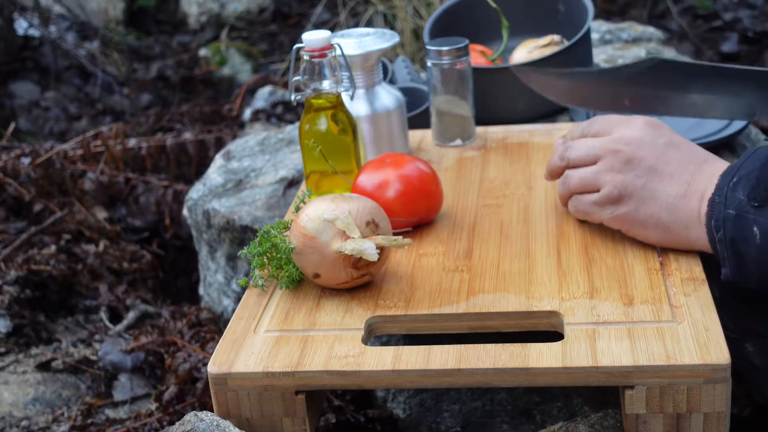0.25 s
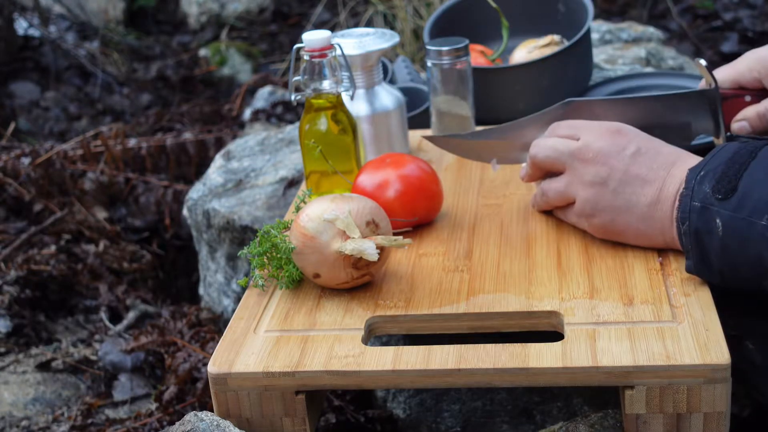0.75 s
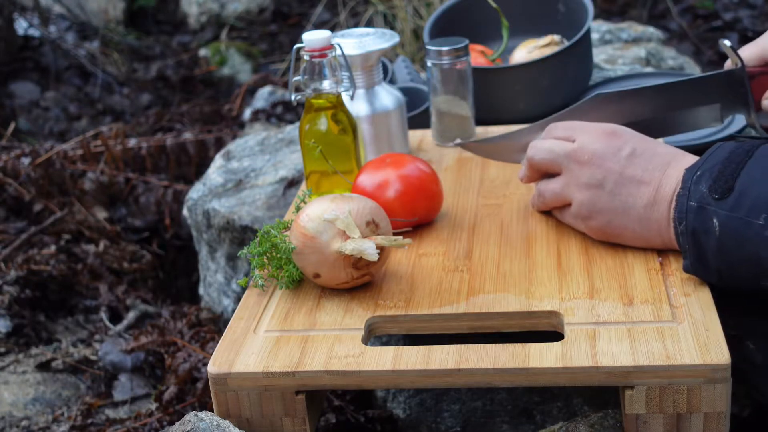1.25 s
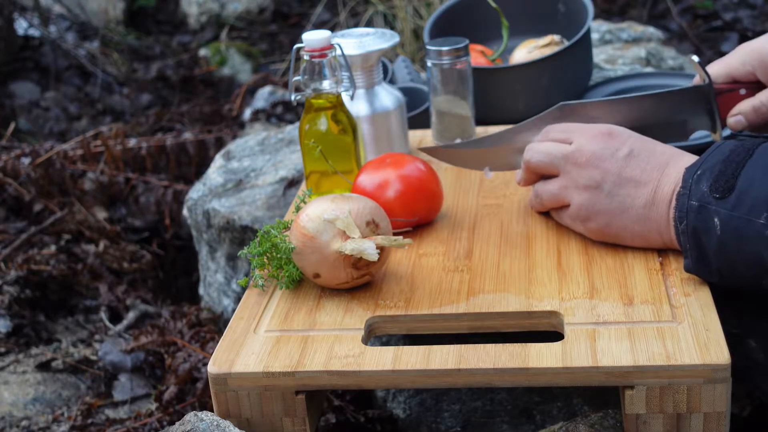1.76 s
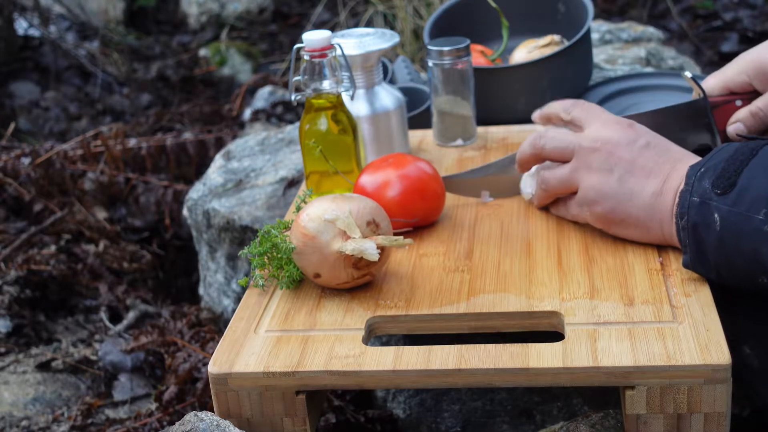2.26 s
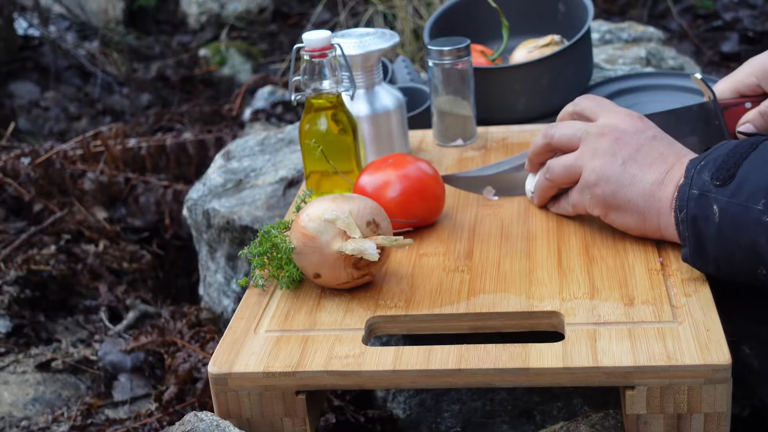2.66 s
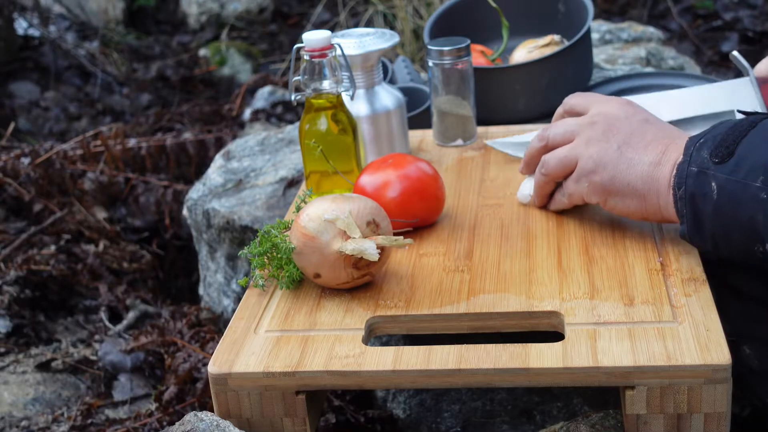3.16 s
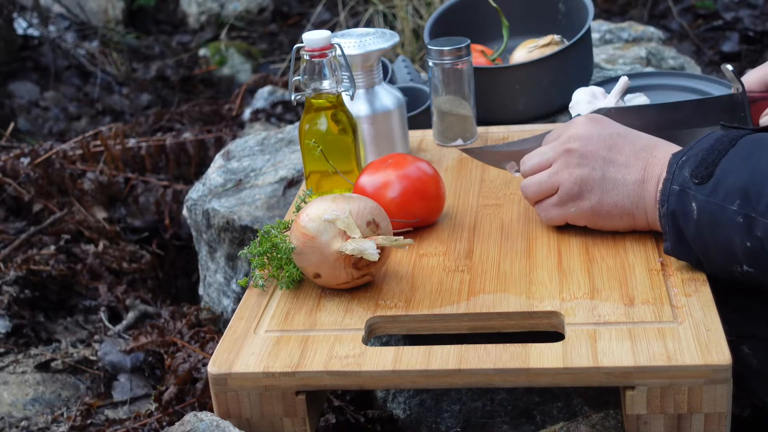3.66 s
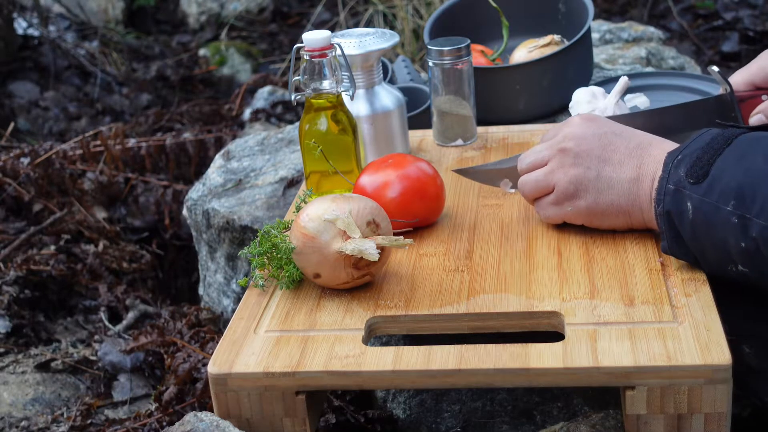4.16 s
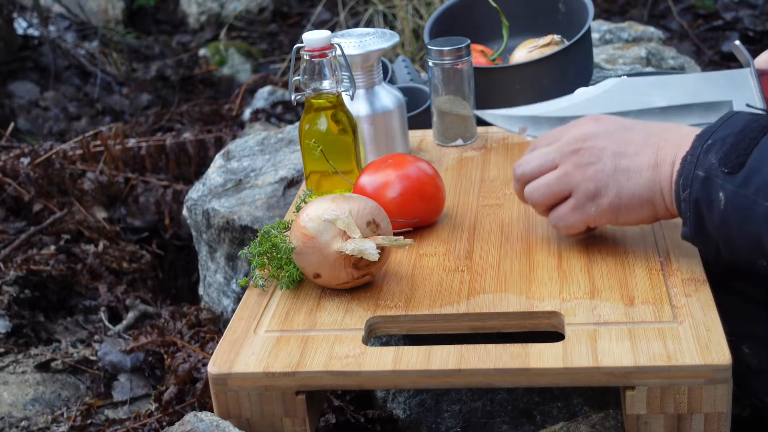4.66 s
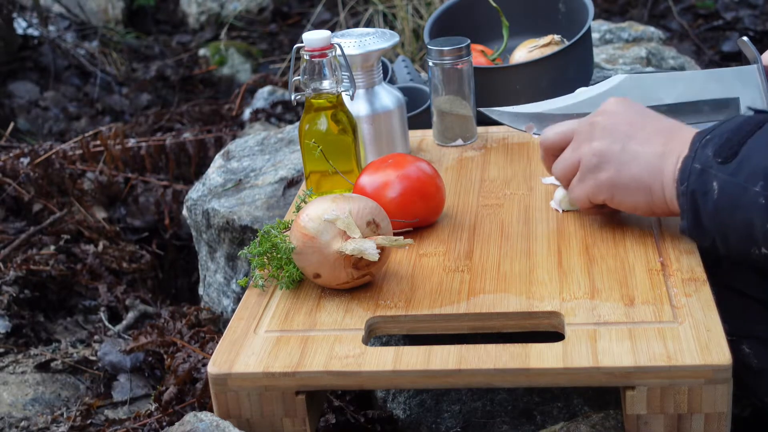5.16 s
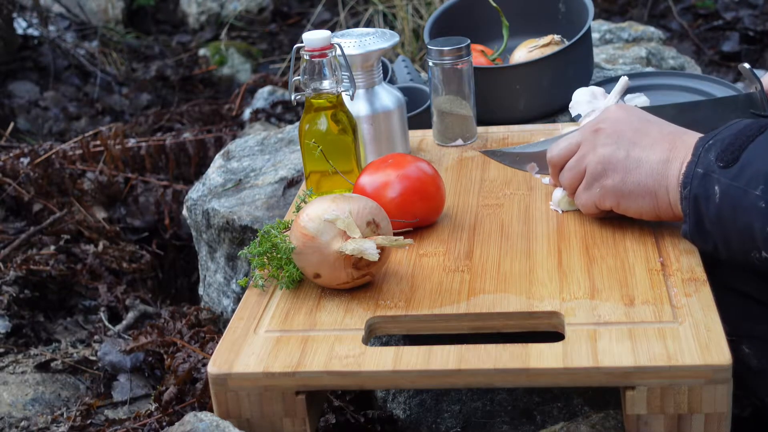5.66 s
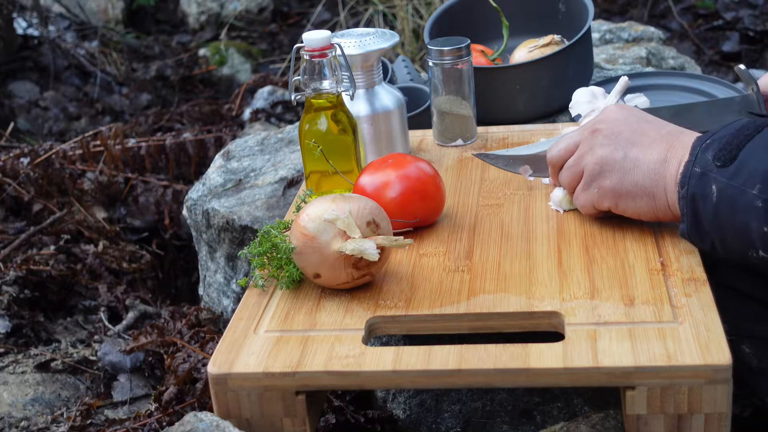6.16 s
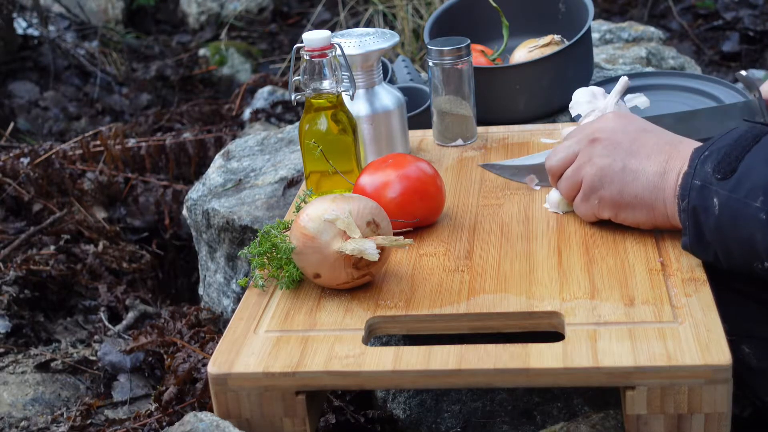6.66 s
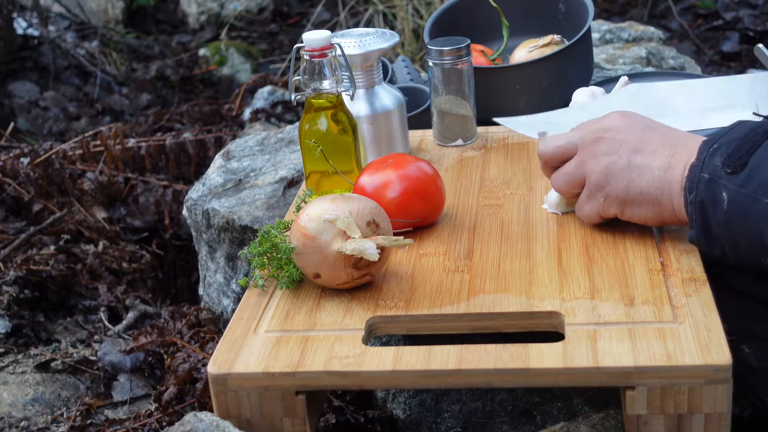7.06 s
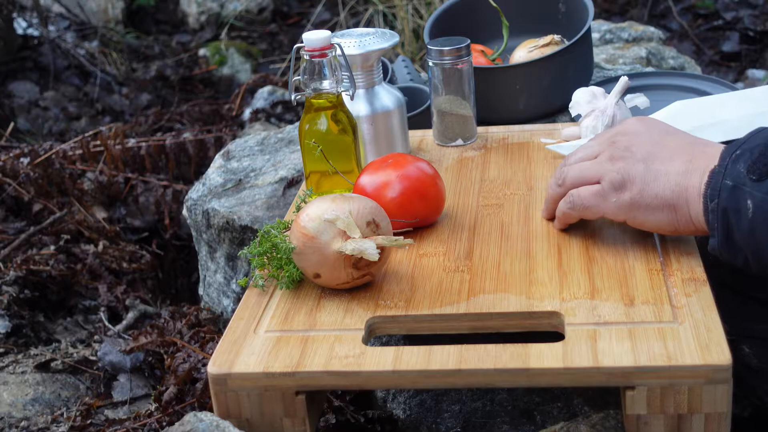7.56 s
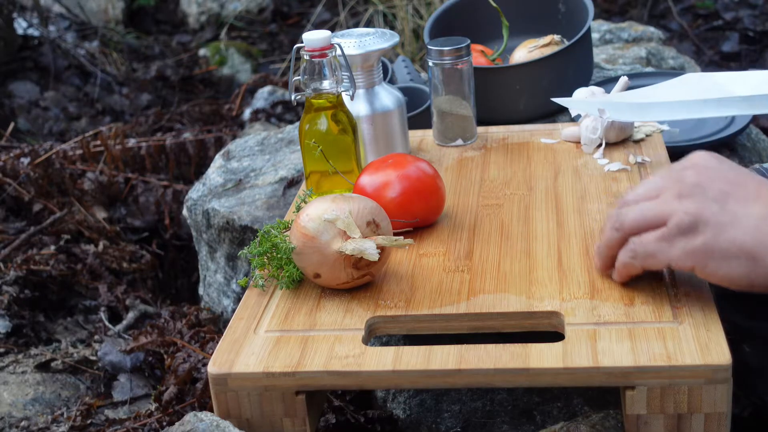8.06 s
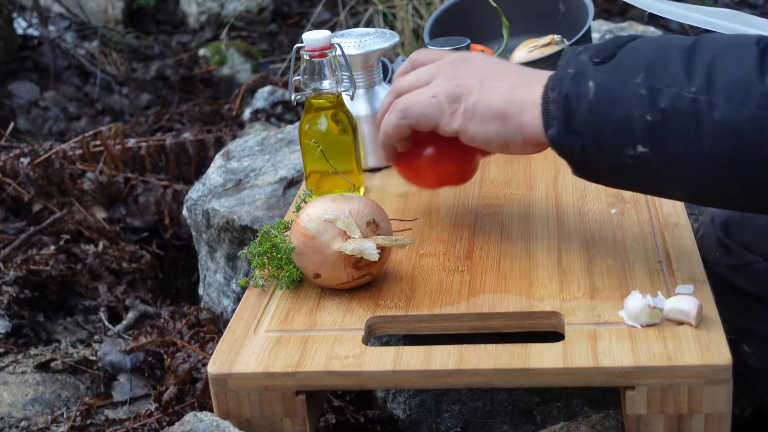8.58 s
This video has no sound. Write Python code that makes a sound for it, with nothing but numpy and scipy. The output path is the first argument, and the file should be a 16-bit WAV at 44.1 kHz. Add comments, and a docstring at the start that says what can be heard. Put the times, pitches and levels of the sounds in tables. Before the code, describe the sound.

Close and slightly right of centre, a hand sets garlic on a bamboo board with a dull thump. Thin skins tick and snap under a pressed knife, then the bulb gives way in a loud crunch and rattling knock. Papery crackling follows, with two more chops, short steel scrapes and soft taps. Cloth swishes from the right at the end. Very quiet outdoor hush, crisp dry detail.

```python
"""Dry skins crackle and snap close by as a big knife is pressed through a garlic bulb on a bamboo board outdoors.
The blade breaks through and knocks: each blow rings modes of board and blade, and heavy chops ring steel ware.
Skins are noise bursts and flurries of short ticks; the scraping edge is random slips through the blade's modes.
Friction also makes the board murmur under fingers and cloves; a sleeve and hand swish as fine, dense slips.
Soft scattering and a slowly drifting hush of filtered noise set the quiet outdoor air."""
import sys
import numpy as np
from scipy import signal
from scipy.fft import rfft, irfft
from scipy.io import wavfile
from scipy.ndimage import uniform_filter1d

SR = 44100
rng = np.random.default_rng(int(sys.argv[2]) if len(sys.argv) > 2 else 0)


def log_audio(samples):
    """Write samples as a 16-bit WAV file to the path given in sys.argv[1]."""
    # one column per channel
    frames = np.atleast_2d(samples).T
    # limit to full scale, then quantise
    limited = np.clip(frames, -1, 1)
    pcm = np.round(limited * 32767).astype(np.int16)
    wavfile.write(sys.argv[1], SR, pcm)


N = 389006

# spectrum of dry garlic skin: (frequency [Hz], gain [dB])
SKIN_SPECTRUM = [(180, -55), (300, -26.5), (537, -33), (574, -22), (678, -16), (1280, -8), (1840, -9),
                 (2520, 3), (3130, 2.5), (4440, 1), (5080, 3), (10900, -7), (13100, -14), (16000, -29.5)]
# modes of the bamboo board on its legs: (frequency [Hz], relative level [dB], t60 [s])
BOARD_MODES = [(187, -14, 0.063), (223, -8.5, .13), (393.7, -8, 0.13), (445.7, -9.5, 0.12),
               (519.6, -3, 0.071), (581.4, 1.5, 0.059), (693.5, -8.5, 0.053), (775, -9, 0.087),
               (914, -6.5, 0.063), (966, -1, 0.067), (1131, 0.5, 0.04), (1210, -1.5, 0.021),
               (1524, -1.5, 0.024), (1734, -4, .05), (2304, -13.5, 0.046), (2330, -3.5, 0.046),
               (3130, -5, 0.04), (3014, -6, 0.1), (3380, -5, .05), (3900, -13, 0.071)]
# spectrum of the board's dense modes: (frequency [Hz], gain [dB])
THUD_SPECTRUM = [(30, -31.5), (90, -25.5), (200, -2.5), (310, -10), (500, -3), (1200, 1.5), (2000, -3),
                 (4000, 1.5), (8000, -20), (16000, -22.5)]
# modes of the blade while held against the board: (frequency [Hz], relative level [dB], t60 [s])
BLADE_MODES = [(1495, -3, 0.069), (2603, -4.5, 0.053), (3720, -5.5, 0.067), (5100, -9, 0.02),
               (5870, -11, .03), (6340, -9.5, 0.082), (7100, -15, .03), (7600, -8.5, 0.066),
               (8300, -10, .045), (9030, -10, 0.035), (9650, -20.5, .05), (10100, -16.5, 0.024),
               (12300, -24.5, .025)]
# the edge dragged over the board: (time [s], rise [s], fall [s], relative peak level [dB], swell [dB],
# treble tilt [dB], steel share [dB])
EDGE_DRAGS = [(2.75, .34, .21, -40, 8, 1, 8), (3.965, .085, .015, -45, 4, -4, 2),
              (4.295, .14, .16, -48.5, 14, -4, 0), (6.22, .06, .015, -50, 6, 8, 1),
              (6.598, .03, .13, -37, 22, 3, 8), (7.335, .095, .17, -43.5, 11, -2, 8)]


def undb(db):
    """Decibels to gain."""
    return 10 ** (np.asarray(db) / 20)


def unit(x):
    """Scale to rms 1."""
    return x / np.sqrt(np.mean(x ** 2) + 1e-20)


def curve(table, column, outside=None):
    """One column of a time table, interpolated at every sample."""
    rows = np.array(table)
    return np.interp(np.arange(N) / SR, rows[:, 0], rows[:, column], outside, outside)


def current(strokes, column):
    """One column of the stroke begun last, at every sample."""
    rows = np.array(strokes)
    latest = np.searchsorted(rows[:, 0], np.arange(N) / SR) - 1
    return rows[np.maximum(latest, 0), column]


def colour(x, points):
    """Causal filter through (frequency [Hz], gain [dB]) points, built from the cepstrum of the log gain."""
    hz, db = np.transpose(points)
    size = 4096
    bins = np.maximum(np.fft.rfftfreq(size, 1 / SR), 1)
    cepstrum = irfft(np.log(undb(np.interp(np.log(bins), np.log(hz), db))))
    # folding the cepstrum forward gives minimum phase
    cepstrum[1:size // 2] *= 2
    cepstrum[size // 2 + 1:] = 0
    impulse = irfft(np.exp(rfft(cepstrum)))
    return signal.fftconvolve(x, impulse)[:len(x)]


def lowpass(x, hz, order=2):
    """Butterworth low-pass."""
    return signal.sosfilt(signal.butter(order, min(hz, SR / 2 - 1), fs=SR, output="sos"), x)


def brighten(x, tilt_db, pivot_hz):
    """See-saw the treble against everything below the pivot."""
    # filtering forward and backward keeps the two bands in phase
    low = lowpass(lowpass(x, pivot_hz, order=1)[::-1], pivot_hz, order=1)[::-1]
    return low * undb(-tilt_db) + (x - low) * undb(tilt_db)


def steady(x, seconds):
    """Hold the rms near 1 over the given span and keep faster detail."""
    power = np.abs(uniform_filter1d(x ** 2, max(int(seconds * SR), 2)))
    return x / np.sqrt(power + np.mean(x ** 2) / 1000)


def fade(t, t60):
    """Exponential decay by 60 dB in t60."""
    return undb(-60 * t / t60)


def ring(modes, t):
    """Impulse response of a table of modes; neighbours swing in opposite senses."""
    out = np.zeros(len(t))
    for k, (hz, db, t60) in enumerate(modes):
        out += (-1) ** k * undb(db) * fade(t, t60) * np.sin(2 * np.pi * hz * t)
    return out


def add(track, s, sound):
    """Mix a sound into a track at time s."""
    i = max(int(s * SR), 0)
    track[i:i + len(sound)] += sound[:N - i]


def slips(per_second, spread_db):
    """Tiny impulses at random times and of random sign; a positive spread lets a few stand out."""
    sizes = undb(spread_db * np.minimum(rng.exponential(size=N), 4))
    return (rng.random(N) < per_second / SR) * sizes * rng.choice([-1, 1], N)


def wander(per_second):
    """Smooth random drift with a spread near 1, kept within two spreads."""
    steps = np.clip(rng.standard_normal(2000), -2, 2)
    return np.interp(np.arange(N) / SR * per_second, np.arange(len(steps)), steps)


def gesture(strokes, touch_s, lift_t60):
    """Gain of strokes that swell to a peak and ease off, with slack: 0 at the peak, 1 at touch and lift."""
    start, rise, fall, peak_db, swell_db = (current(strokes, column=k) for k in range(5))
    since = np.arange(N) / SR - start
    slack = np.clip(np.maximum(1 - since / rise, (since - rise) / fall), 0, 1)
    contact = np.clip(since / touch_s, 0, 1) * fade(np.maximum(since - rise - fall, 0), lift_t60)
    return contact * undb(peak_db - swell_db * slack), slack


def crackle(bulb_db=-1, hollow_hz=2850, hollow_q=7.1, count=10):
    """Flakes of skin, each with its own short ring, tick in flurries over a papery rustle."""
    # the bulb is crushed, then pulled apart: (time [s], relative level [dB], treble share [dB])
    bulb_breaks = [(1.69, -52, -2), (1.728, -36, -2.5), (1.738, -25.5, -6.5), (1.774, -30.5, -4.5),
                   (1.81, -21.5, -6.5), (1.856, -18.5, -4.5), (1.87, -26, -11.5), (1.912, -28.5, -4.5),
                   (2.038, -46.5, -5.5), (2.076, -36.5, -9.5), (2.094, -41, -5), (2.114, -31.5, -4),
                   (2.132, -47, -5.5), (2.306, -33, -6), (2.346, -45.5, -5), (2.462, -35, -6.5),
                   (2.472, -41, -7), (2.544, -34, -9), (2.58, -40.5, -7.5), (2.612, -28, -2),
                   (2.672, -37, -8), (2.744, -32, -8), (2.822, -51.5, -9.5), (2.87, -50, -1.5)]
    plain_treble_db = -5.5  # treble share in skin of plain brightness
    # fingers and edge rustling loose skin, and a dull rustle of the moving hand:
    # (time [s], rise [s], fall [s], peak level [dB], swell [dB], treble tilt [dB])
    rustle_strokes = [(0, 0.012, .03, -53, 3, -10), (.51, 0.11, 0.021, -52.5, -2.5, 1.5),
                      (1.245, 0.018, 0.063, -44, 16, 2), (1.43, 0.08, 0.09, -44.5, 11, 3.5),
                      (1.57, 0.032, 0.11, -48.5, 7, -3), (3.305, 0.095, 0.076, -57, 2.5, -0.5),
                      (3.48, 0.039, 0.036, -48.5, 17, 6.5), (3.665, .015, 0.12, -57, 0, -1),
                      (3.77, 0.012, 0.041, -44.5, 17.5, 5), (3.965, 0.091, 0.016, -41, 8, 9),
                      (4.868, 0.028, 0.067, -41.5, 20.5, 12), (5.01, 0.17, 0.034, -54, 0.5, -10),
                      (6.562, 0.054, 0.014, -45, 3, 3), (7.13, 0.035, 0.03, -51, 16, 7.5),
                      (7.735, .035, 0.038, -48, 14, 3.5)]
    # ring of the hollow between bulb and cupped fingers: (time [s], share [dB])
    hollow_share = [(1.7, -24.5), (1.85, -11), (2.05, -13), (2.3, -5), (2.38, -15), (2.45, -1.5), (2.6, -2),
                    (2.72, -32.5)]

    t = np.arange(SR // 50) / SR
    ticks = np.zeros(N)
    for _ in range(count):
        flurry = slips(per_second=110, spread_db=4.8) * undb(4 * wander(per_second=25))
        flake = rng.standard_normal(len(t)) * fade(t, t60=.008)
        ticks += signal.oaconvolve(flurry, flake)[:N]
    papery = undb(-9) * rng.standard_normal(N)
    paper = colour(unit(ticks) + papery, SKIN_SPECTRUM)
    hollow = signal.lfilter(*signal.iirpeak(hollow_hz, hollow_q, fs=SR), paper)
    paper = unit(paper) + undb(curve(hollow_share, column=1)) * unit(hollow)

    bulb = undb(curve(bulb_breaks, column=1, outside=-np.inf) + bulb_db)
    rustling, _ = gesture(rustle_strokes, touch_s=0.016, lift_t60=.15)
    bulb_tilt_db = curve(bulb_breaks, column=2) - plain_treble_db
    tilt_db = np.where(bulb > 0, bulb_tilt_db, current(rustle_strokes, column=5))
    return steady(brighten(paper, tilt_db, pivot_hz=5000), seconds=.03) * (bulb + rustling)


def snaps(snap_db=-1, crack_t60=0.012, strain_db=-18, strain_t60=.02, pivot_hz=5000, count=9):
    """A skin starts to give, breaks with a very short crack, then the loose flake flutters out."""
    # the loudest snaps of dry skin: (time [s], relative level of the first 4 ms [dB], brightness [dB per octave])
    loud_snaps = [(.271, -51, 3), (.5619, -43, 0), (0.616, -36.5, 2), (.623, -38, -1), (0.6645, -33.5, 0.5),
                  (0.674, -34, -3.5), (.68, -38, 1), (0.8187, -39, 0), (0.8305, -42, 4), (.949, -40.5, 2),
                  (1.0284, -38.5, -2.5), (1.0408, -39.5, 5), (1.137, -47, 3), (1.16, -43, 6.5),
                  (1.2724, -30.5, -3.5), (1.367, -34, -3.5), (1.4341, -32.5, 1), (1.4837, -25, .5),
                  (1.5557, -37, 3.5), (1.714, -32, 0), (1.74, -26, -3.5), (1.822, -19.5, -3),
                  (1.8567, -16.5, -7), (1.9915, -31, -19), (2.072, -33, -13.5), (2.1114, -32, -2),
                  (2.301, -37, -5), (2.5404, -33, -4), (2.565, -35, -3), (2.608, -27, 16), (2.6198, -26, 0),
                  (2.723, -33, -3.5), (2.906, -31.5, -7), (2.9154, -29, -19), (3.0492, -25.5, -6),
                  (3.127, -35, -2), (3.192, -35, -4), (3.266, -35.5, -3), (3.346, -45.5, -0.5),
                  (3.7756, -40.5, 0), (3.9546, -38.5, -0.5), (3.9713, -37.5, 6.5), (4.0225, -39, -6),
                  (4.043, -27.5, 3.5), (4.9073, -37, 1), (5.1776, -38.5, -2), (6.044, -51, 0.5),
                  (6.0972, -40.5, 2), (6.1962, -43.5, 2), (6.257, -42, 2), (6.2898, -32, 1),
                  (6.6136, -29, 2.5), (7.075, -46.5, 7.5), (7.1438, -45, 4), (7.541, -39, -12),
                  (7.556, -43.5, -12)]
    flutter_db, flutter_t60 = -17, 0.06
    # faint snaps come by chance while the garlic is handled
    handling_s = (.25, 7.8)
    stray_db, stray_spread_db, stray_tilt_db = -55.5, -1, 6

    lead = SR // 50  # samples of strain before the break
    out, t = np.zeros(N), np.arange(-lead, SR // 10) / SR
    hz, skin_db = np.transpose(SKIN_SPECTRUM)
    octaves = np.log2(np.maximum(hz, 1800) / pivot_hz)
    strain = undb(strain_db) * fade(abs(t), strain_t60)
    release = fade(abs(t), crack_t60) + undb(flutter_db) * fade(abs(t), flutter_t60)
    shape = np.where(t < 0, strain, release)

    strays = []
    for _ in range(count):
        s = rng.uniform(*handling_s)
        strays.append((s, stray_db + stray_spread_db * rng.standard_normal(), stray_tilt_db))
    for s, level_db, tilt_db in loud_snaps + strays:
        burst = rng.standard_normal(len(t)) * shape
        # smaller flakes sound brighter
        crack = colour(burst, np.column_stack([hz, skin_db + tilt_db * octaves]))
        onset = crack[lead:lead + SR // 250]
        add(out, s + t[0], undb(level_db + snap_db) * crack / np.std(onset))
    return out


def knocks(board_db=-14, blade_db=-10, thud_db=-16, thud_t60=0.073, tail_db=-41, tail_t60=1.0, count=3):
    """Each contact rings board and blade; a softer one loses the treble, a rattling one lands three times."""
    # blade, cloves and knuckles landing on the board, and one short bright scrape of the blade:
    # (time [s], relative force [dB], contact cut-off [Hz], relative blade share [dB], rattle [s])
    contacts = [(.061, -34, 900, -20, 0.005), (0.066, -14.5, 330, -20, 0), (1.271, -29, 2520, -17, 0),
                (1.484, -30, 2500, -16, 0.0015), (1.8636, -3.5, 2300, -2, 0.012),
                (1.881, -7, 3200, -15, 0.0019), (1.892, -6.5, 1620, 4, 0.0013), (1.918, -23.5, 1610, 5, 0),
                (1.954, -24, 891, -10, 0.0015), (2.076, -24, 800, -15, 0.00073), (2.164, -36, 2000, 13, 0),
                (3.091, -35, 9080, 20.5, 0), (3.131, -18.5, 937.2, -12.5, 0),
                (3.971, -34.5, 2550, .5, 0.0047), (4.0484, -8.5, 1450, 8, .0091),
                (4.596, -37, 793, -16, 0.0019), (5.17, -29.5, 1100, -19, .0036),
                (6.295, -7.5, 2599, -6.5, 0.01), (6.744, -37, 695, -13.5, 0.0032),
                (7.2839, -22, 2000, -3, .0034), (7.354, -32, 330, -20, 0.0047),
                (7.454, -27, 400, -20, 0.0018), (7.506, -19.5, 279.6, -19, .0317)]
    # the landings of a rattle grow weaker and further apart
    rebound_db, rebound_spread = -1.43, 1.2

    out, t = np.zeros(N), np.arange(SR) / SR
    board, blade = ring(BOARD_MODES, t), ring(BLADE_MODES, t)
    dense_decay = undb(thud_db) * fade(t, thud_t60) + undb(tail_db) * fade(t, tail_t60)
    for s, force_db, contact_hz, blade_share_db, rattle_s in contacts:
        for k in range(count if rattle_s > 0 else 1):
            dense = unit(colour(rng.standard_normal(SR), THUD_SPECTRUM)) * dense_decay
            body = undb(board_db) * board + undb(blade_db + blade_share_db) * blade + dense
            landing = lowpass(body, contact_hz, order=3)
            lands_s = s + rattle_s * (k / (count - 1)) ** rebound_spread
            add(out, lands_s, undb(force_db + k * rebound_db) * landing)
    return out


def scrape(drag, slack, jerk_db=3.0):
    """The edge sticks and slips on the grain: the blade sings and crumbs of skin grind under it."""
    # where the edge bites less firmly the steel sings less and the grit dulls
    light_steel_db, light_tilt_db = -10, -2.5

    friction = slips(per_second=1500, spread_db=-0.5) * undb(jerk_db * wander(per_second=110))
    t, samples, steel = np.arange(SR // 5) / SR, np.arange(N), np.zeros(N)
    for mode in BLADE_MODES:
        tone = signal.oaconvolve(friction, ring([mode], t))[:N]
        # as the contact point travels along the edge, each mode bends a little and swells on its own
        bend_s = .00006 * wander(per_second=30)
        bent = np.interp(samples + bend_s * SR, samples, tone)
        steel += bent * undb(3 * wander(per_second=18))
    steel_gain = undb(current(EDGE_DRAGS, column=6) + light_steel_db * slack)
    grit = unit(colour(friction, SKIN_SPECTRUM))
    tilt_db = current(EDGE_DRAGS, column=5) + light_tilt_db * slack
    sound = brighten(steel_gain * unit(steel) + grit, tilt_db, pivot_hz=4780)
    return steady(sound, seconds=0.033) * drag


def rub(drag, rub_db=-1, drag_wood_db=-7.5, dense_db=-7):
    """Soft friction of fingers, cloves and the dragged edge makes the board's modes murmur."""
    # hand, cloves and the dragged edge rubbing the board:
    # (time [s], rise [s], fall [s], relative peak level [dB], swell [dB])
    rub_strokes = [(.51, 0.11, 0.087, -55, 6.5), (.84, 0.083, 0.22, -62, 7), (1.47, 0.016, 0.17, -61, 5),
                   (1.66, 0.22, 0.023, -37, 22.5), (1.918, 0.021, 0.078, -30, 29),
                   (2.08, 0.028, 0.18, -52, 7), (2.595, 0.16, 0.04, -47.5, 13), (4.295, 0.1, .15, -55, 9),
                   (4.88, 0.012, 0.12, -52.5, 13), (6.088, .012, 0.031, -49, 15),
                   (7.32, 0.13, 0.089, -57.5, 1)]
    friction = lowpass(slips(per_second=830, spread_db=5), 800, order=1)
    wood = signal.oaconvolve(friction, ring(BOARD_MODES, np.arange(SR // 5) / SR))[:N]
    dense = unit(colour(friction, THUD_SPECTRUM))
    murmur = steady(unit(wood) + undb(dense_db) * dense, seconds=.04)
    rubbing, _ = gesture(rub_strokes, touch_s=0.016, lift_t60=0.13)
    return murmur * (undb(rub_db) * rubbing + undb(drag_wood_db) * drag)


def steel_ware():
    """The modes of flask and pans ring on faintly after each heavy chop."""
    # steel flask and pans by the board: (frequency [Hz], relative level [dB], t60 [s])
    ware_modes = [(462, -0.5, .3), (610, 6.5, 0.3), (815, -3, 1.01), (996, -5, 0.37), (1450, -14.5, 1),
                  (1748, 4, 0.81), (1803, 5.5, 0.4), (2270, -11.5, .9), (2310, -10.5, 1), (2880, -14, 0.8),
                  (3620, -0.5, 0.95), (3580, 3.5, 0.26), (3640, -5.5, 0.63), (3840, -6.5, 0.28),
                  (5210, -14, .45), (6550, -6, .28)]
    # heavy chops that shake the steel ware: (time [s], level [dB])
    jolts = [(1.872, -39.5), (4.053, -65), (6.297, -46)]
    out, chime = np.zeros(N), ring(ware_modes, np.arange(SR) / SR)
    for s, jolt_db in jolts:
        add(out, s, undb(jolt_db) * chime)
    return out


def swish():
    """Countless fibres slip at once: a nearly smooth hiss."""
    # sleeve and palm sliding: (time [s], rise [s], fall [s], peak level [dB], swell [dB])
    slides = [(0, 0.008, .3, -60, 11.5), (.35, 0.41, 0.14, -63, 11), (.82, 0.048, .28, -49.5, 13.5),
              (1.15, 0.36, .09, -63, 2), (1.55, .1, .07, -56.5, 1), (3.3, .1, 0.44, -63.5, 11),
              (4.08, 0.031, 0.13, -61, 8), (4.35, 0.23, 0.34, -69, 2), (5, 0.12, 0.28, -56.5, 16),
              (6.15, 0.44, .48, -63.5, 8), (7.1, 0.67, .14, -59.5, 8), (7.8, 0.31, 0.12, -52.5, 7.5),
              (8.42, 0.35, 0.11, -57.5, 17.5)]
    # spectrum of the cloth: (frequency [Hz], gain [dB])
    cloth_spectrum = [(88, -41.5), (150, -11.5), (222, -2), (334, -15.5), (589, -1), (1760, -0.5),
                      (4580, 2), (12700, -8.5), (16000, -20)]
    rest_db = -72.5  # the arm is never quite still
    slide, _ = gesture(slides, touch_s=0.017, lift_t60=0.086)
    hiss = unit(colour(slips(per_second=12000, spread_db=3.5), cloth_spectrum))
    return hiss * (slide + undb(rest_db))


def surroundings(x, far_db=-37, far_t60=0.99):
    """Rocks and pots scatter the shorter waves in a quick tail; the trees give a softer, longer one."""
    t = np.arange(SR // 2) / SR
    near, far = (unit(rng.standard_normal(len(t)) * fade(t, t60)) / np.sqrt(len(t)) for t60 in (.085, far_t60))
    near = colour(near, [(200, -29), (600, -21), (5000, -19), (9000, -18), (13000, -11)])
    return signal.oaconvolve(x, near + undb(far_db) * lowpass(far, 5000))[:N]


def air(air_db=-65, side_db=-12):
    """Faint outdoor hush of coloured noise that drifts by about a decibel."""
    # spectrum of the hush: (frequency [Hz], gain [dB])
    air_spectrum = [(12, -47), (20, -20.5), (68, -12.5), (241, -7.5), (310, -6), (574, -3.5), (825, -2),
                    (1220, -7.5), (2080, -11), (2390, -20), (2670, -14), (11400, -24), (16000, -28.5)]
    mid, side = (unit(colour(rng.standard_normal(N), air_spectrum)) for _ in range(2))
    stereo = mid + undb(side_db) * side * np.array([[1], [-1]])
    return undb(air_db + wander(per_second=1.0)) * stereo


def scene(low_cut_hz=115, arm_right_db=6.5):
    """All the work happens on the board, slightly right of centre; the arm comes in from further right."""
    # how much louder the right side is than the left: (frequency [Hz], level [dB])
    right_lead = [(200, .5), (600, 1.6), (2000, 1.8), (5000, 2.2), (9000, 0), (13000, -.9)]
    drag, slack = gesture(EDGE_DRAGS, touch_s=.01, lift_t60=.04)
    work = crackle() + snaps() + knocks() + scrape(drag, slack) + rub(drag) + steel_ware()
    # a low cut thins the bass of the work sounds
    work = signal.sosfilt(signal.butter(2, low_cut_hz, "highpass", fs=SR, output="sos"), work)
    arm, sides = swish(), []
    for sign in (-1, 1):  # left, right
        direct = work + undb(sign * arm_right_db / 2) * arm
        placed = colour(direct, [(hz, sign * db / 2) for hz, db in right_lead])
        sides.append(placed + surroundings(work + arm))
    return np.array(sides) + air()


def record(dry):
    """The recorder cuts off the highest treble with a steep low-pass."""
    top_hz = 15900
    return signal.sosfilt(signal.ellip(10, .2, 80, top_hz, fs=SR, output="sos"), dry)


dry = scene()
out = record(dry)
log_audio(out)
```